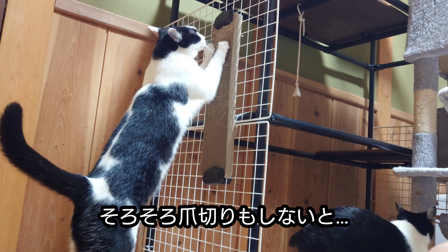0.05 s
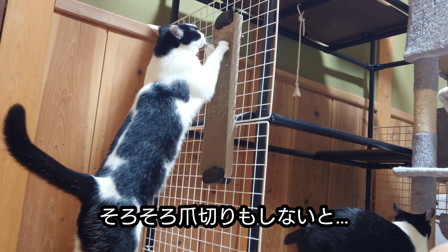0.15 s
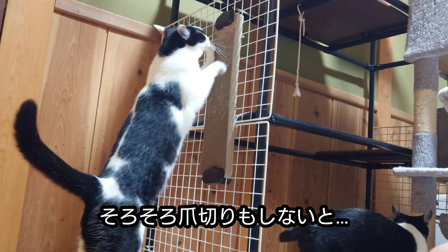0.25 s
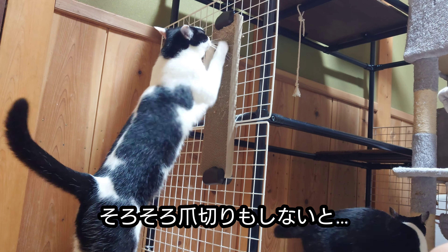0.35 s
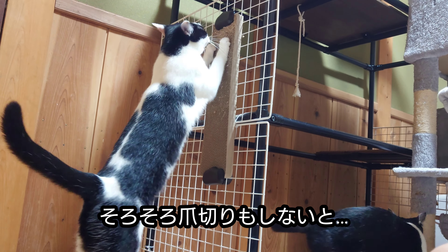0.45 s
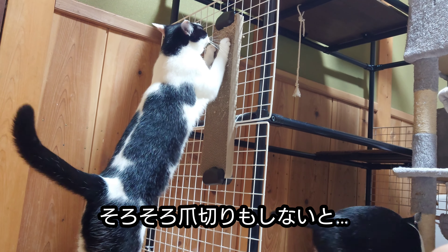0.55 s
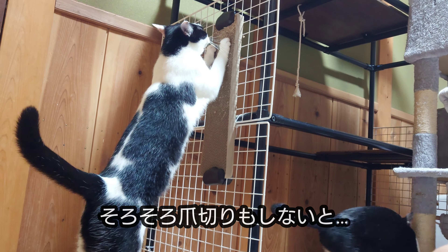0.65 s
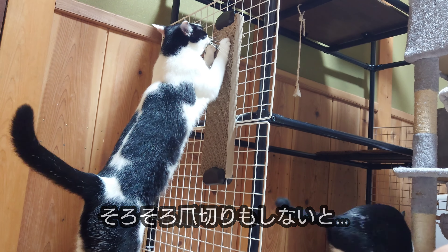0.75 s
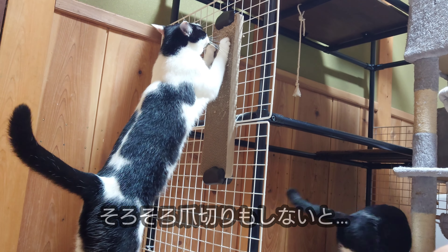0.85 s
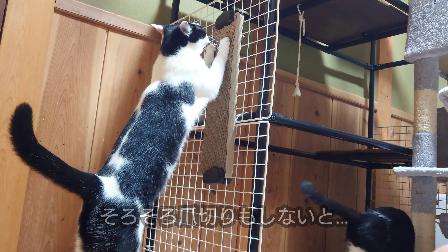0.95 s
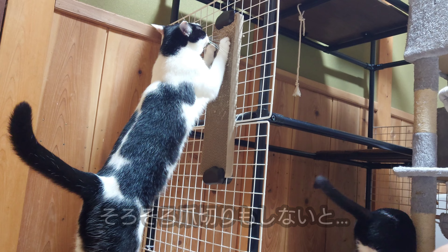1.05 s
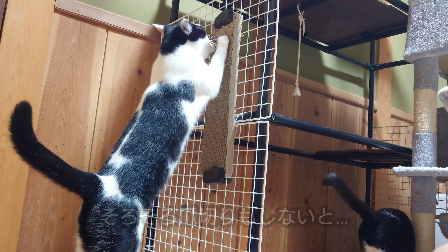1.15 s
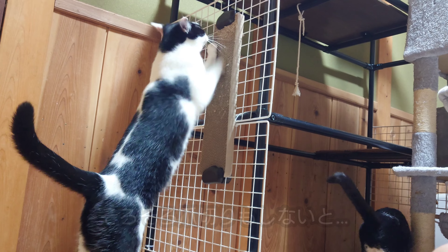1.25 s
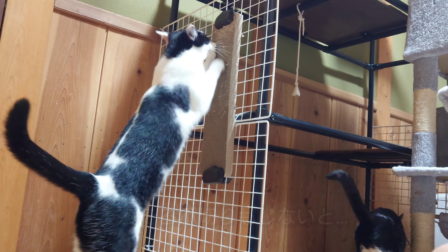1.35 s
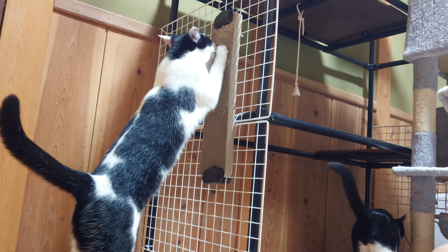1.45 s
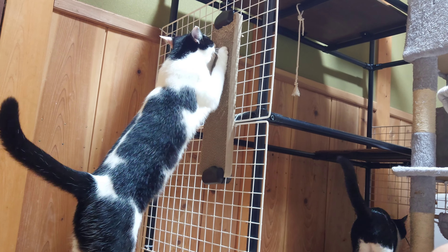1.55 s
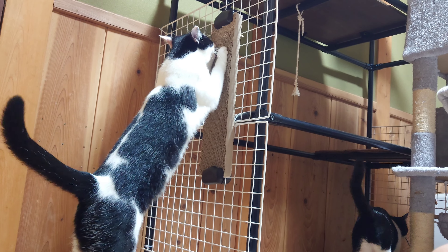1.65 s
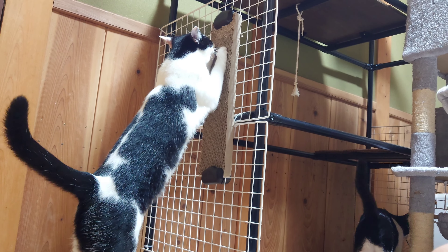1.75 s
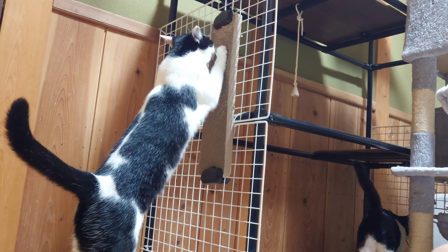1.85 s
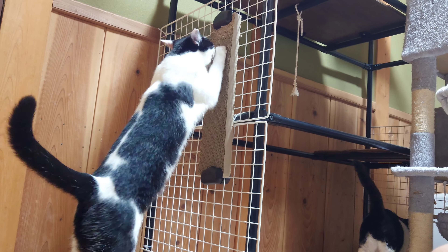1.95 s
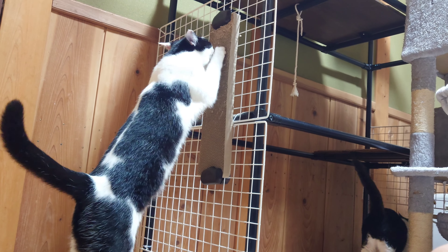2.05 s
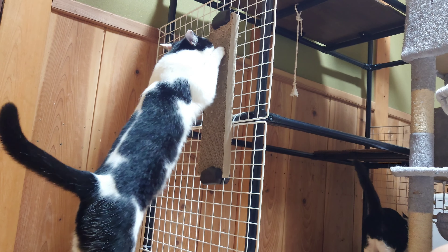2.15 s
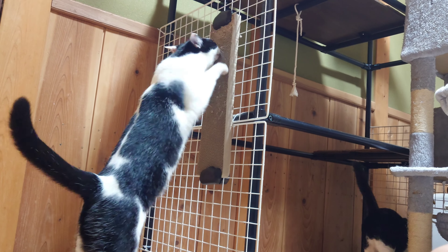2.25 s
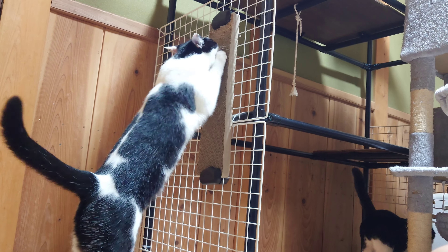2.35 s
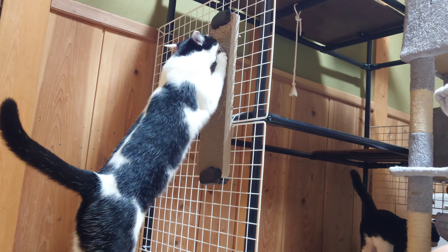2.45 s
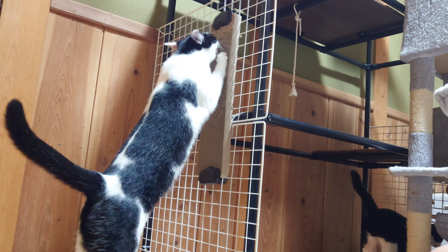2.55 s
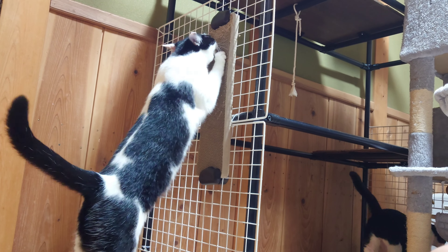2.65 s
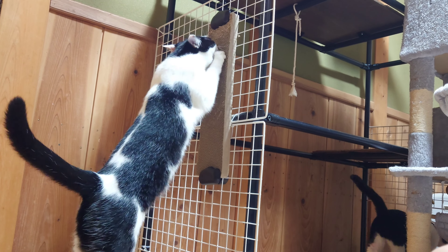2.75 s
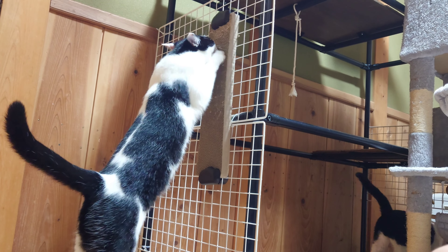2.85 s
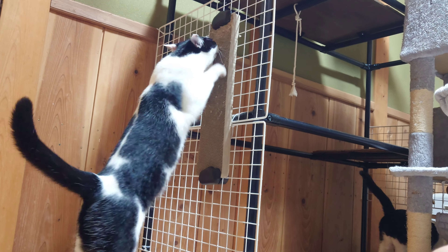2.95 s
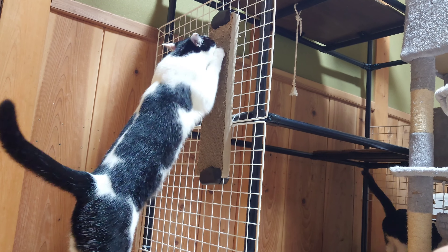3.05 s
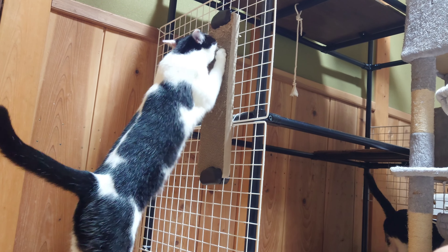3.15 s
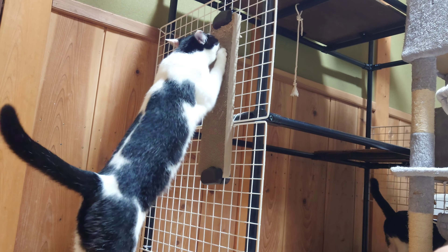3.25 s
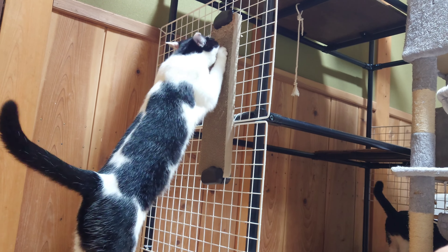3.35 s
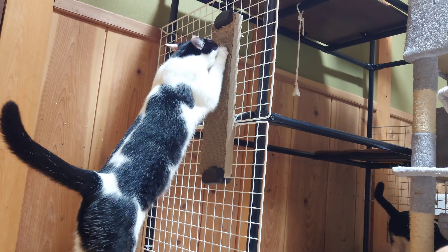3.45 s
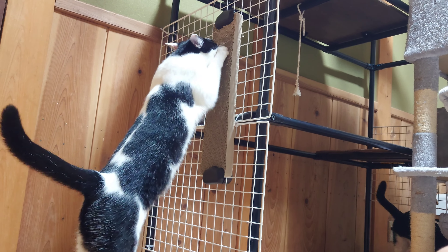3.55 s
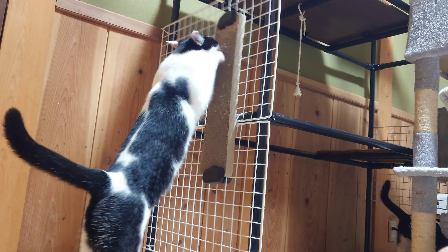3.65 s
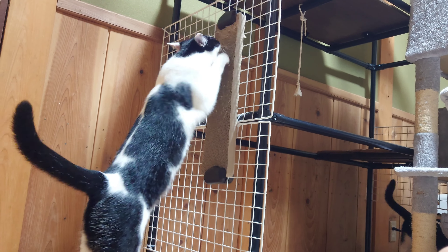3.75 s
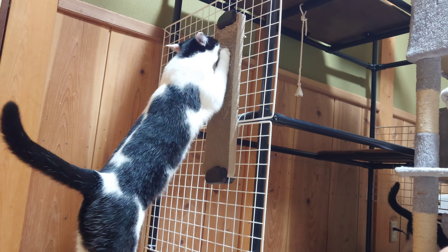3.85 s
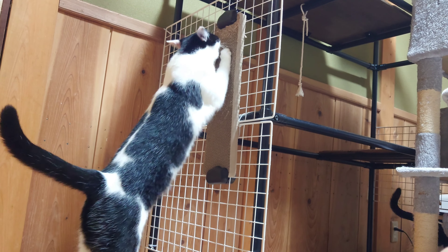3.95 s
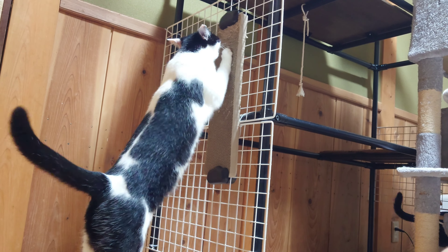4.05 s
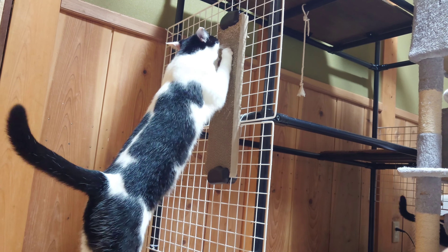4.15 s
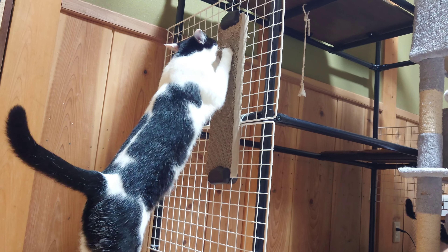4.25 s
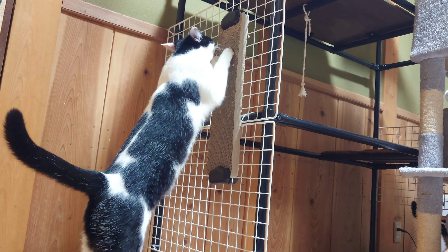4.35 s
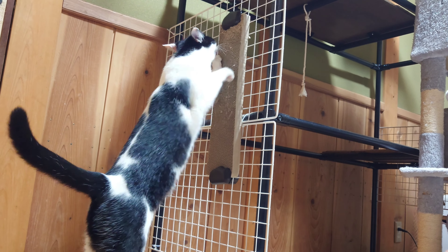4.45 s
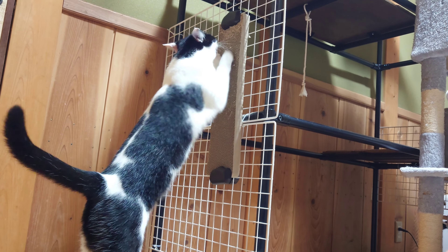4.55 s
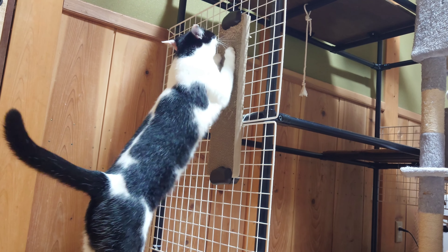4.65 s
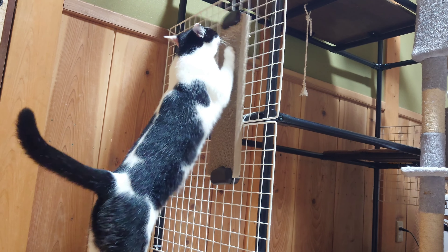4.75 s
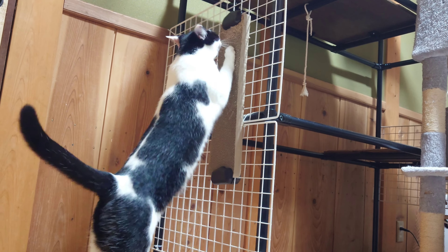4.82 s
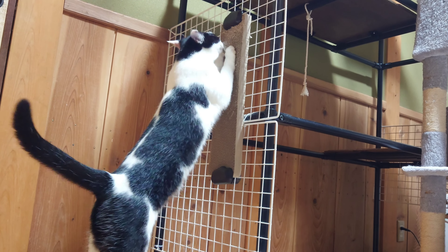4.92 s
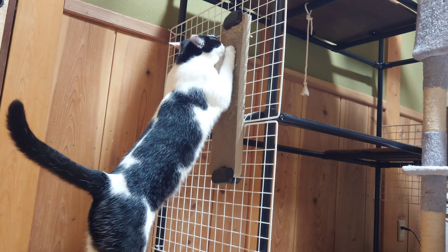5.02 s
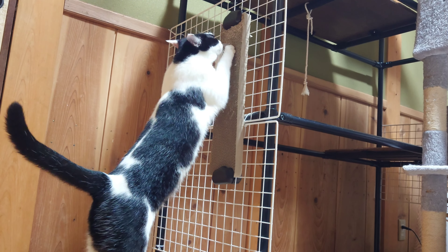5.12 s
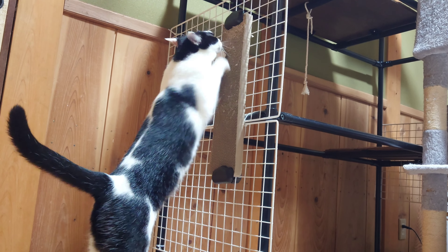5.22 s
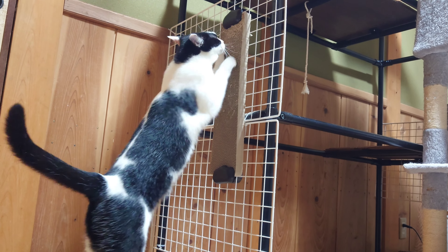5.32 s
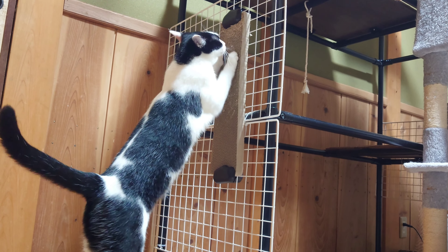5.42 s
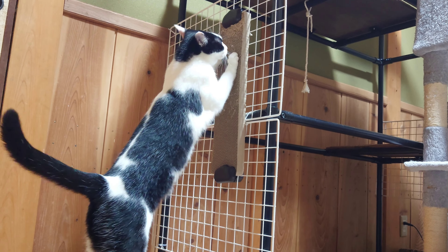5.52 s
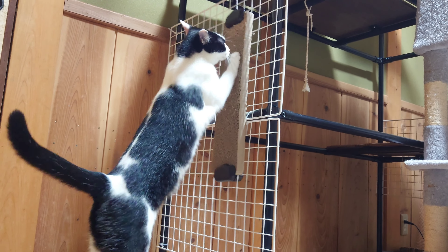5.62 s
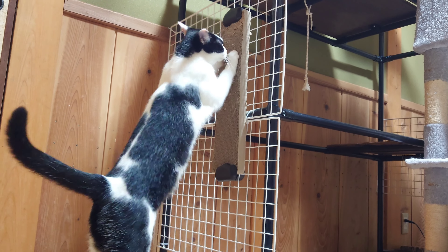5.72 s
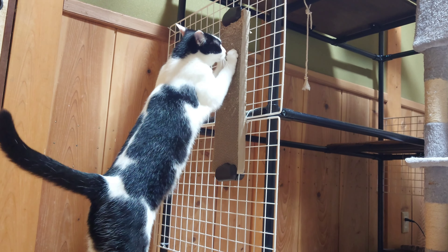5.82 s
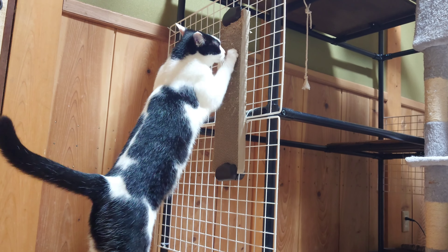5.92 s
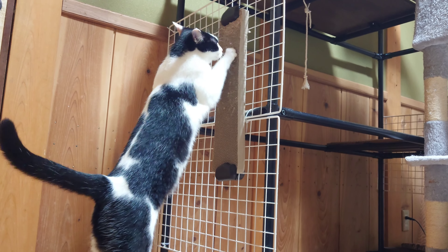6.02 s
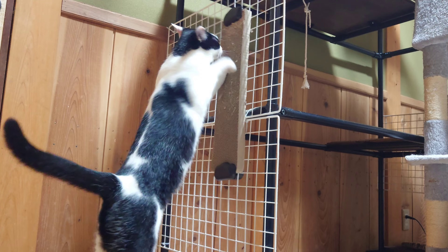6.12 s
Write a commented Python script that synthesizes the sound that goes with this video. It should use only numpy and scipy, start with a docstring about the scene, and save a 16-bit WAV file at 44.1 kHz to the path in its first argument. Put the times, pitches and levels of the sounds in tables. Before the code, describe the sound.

Claws tick onto cardboard, catch, then tear through it in short dry bursts. The wire mesh behind rings briefly and the loose panel thuds and shudders low on its frame. Early strokes are sparse, with two brief breaks; after about two seconds they become regular and stronger, with extra snags and taps between. Near microphone, slightly wide stereo, short small-room reverberation, faint background hiss.

```python
"""Cat on a cardboard scratching board

A cat claws a board tied to a wire mesh panel in a small wood-lined room, heard close by in stereo.
Each paw lands with a tick, then the claws rip through the paper flutes: bursts of random fibre snaps.
The pull of each rip excites the wires, modelled as ringing modes, and the panel rumbles on its frame.
Snags, further taps and bumps join the strokes, over a short reverberation and a faint steady hiss and hum."""
import sys
import numpy as np
from scipy import signal
from scipy.fft import rfft, irfft, next_fast_len
from scipy.io import wavfile
from scipy.ndimage import uniform_filter1d

SR = 44100
rng = np.random.default_rng(int(sys.argv[2]) if len(sys.argv) > 2 else 0)


def materialize(psi):
    """Save the field psi as 16-bit PCM at rate SR to the path in sys.argv[1].

    A 1-D psi becomes a single channel; in a 2-D psi each row is a channel.
    """
    bounded = np.clip(np.atleast_2d(psi).T, -1, 1)
    quanta = np.round(bounded * 32767).astype(np.int16)
    wavfile.write(sys.argv[1], SR, quanta)


N = 272538
TIME = np.arange(N) / SR


def undb(db):
    """Decibels to gain."""
    return 10 ** (np.asarray(db) / 20)


def unit(x):
    """Scale to an energy of one in each channel."""
    return x / np.sqrt(np.sum(x ** 2, axis=-1, keepdims=True) + 1e-18)


def on_log(hz, table, axis=1):
    """Read a column of a table on a log-frequency axis."""
    table = np.array(table)
    return np.interp(np.log(np.maximum(hz, 1)), np.log(table[:, 0]), table[:, axis])


def convolve(x, response):
    """Pass a sound through a mono or stereo response."""
    return signal.fftconvolve(np.atleast_2d(x), np.atleast_2d(response), axes=-1)[:, :N]


def colour(gain_at, size=1024):
    """Causal (minimum-phase) response of unit energy whose relative dB at each frequency is gain_at(Hz)."""
    cepstrum = irfft(np.log(undb(gain_at(np.fft.rfftfreq(size, 1 / SR)))))
    # fold the cepstrum forward so that nothing sounds before its cause
    cepstrum[1:size // 2] *= 2
    cepstrum[size // 2 + 1:] = 0
    return unit(irfft(np.exp(rfft(cepstrum))))


def add(track, s, sound):
    """Mix a sound into a track at time s."""
    start = max(int(s * SR), 0)
    track[..., start:start + sound.shape[-1]] += sound[..., :N - start]


def crackle(size, per_s, scatter_db):
    """Fibres snapping at random moments with uneven strength; rms 1."""
    snaps = rng.random(size) < per_s / SR
    signs = rng.choice([-1, 1], size)
    strength = undb(scatter_db * np.clip(rng.standard_normal(size), -2, 2)) * signs
    return unit(snaps * strength) * np.sqrt(size)


def flutes(size, per_s, depth_db):
    """Gain of a claw that grips and slips unevenly over the ridges of the board."""
    step = int(SR / per_s)
    grip = np.clip(rng.standard_normal(size // step + 2), -1.5, 1.5)
    return undb(depth_db * np.interp(np.arange(size) / step, np.arange(len(grip)), grip))


def nearby(sound, wall_db):
    """A close sound arrives straight, then off the panels around it, in a new pattern for each place."""
    t = TIME[:SR // 28]
    scatter = rng.standard_normal((2, len(t)))
    arrivals = unit(scatter * np.sqrt(t) * np.exp(-t / 0.0047)) * undb(wall_db)
    arrivals[:, 0] += 1  # the straight path
    return convolve(sound, unit(arrivals))


# Torn cardboard up close. Each row: frequency in Hz, relative level in dB.
PAPER_TONE = [(150, -15), (400, -8), (700, -7.5), (950, 0), (1500, 0), (1850, -2.5), (2350, 1), (3100, -3),
              (4200, -4), (4900, -5), (7000, -6), (9500, -16.5), (11000, -11.5), (16000, -18.5)]
# The hard crack of a claw letting go. Each row: frequency in Hz, relative level in dB.
CRACK_TONE = [(300, -22), (1500, -3), (4000, -2), (7000, -4.5), (10000, 3), (16000, -1.5)]


def rip(db, treble_db, tear_s, drag_db):
    """A rip is a crack, a tear and a weaker drag; returns its sound and the force on the board."""
    t = TIME[:SR // 2]
    # the tear swells in within a millisecond, then fades away at once
    tear = crackle(len(t), per_s=3200, scatter_db=4.5) * flutes(len(t), per_s=300, depth_db=2.0)
    tear_shape = np.exp(-(t / tear_s) ** 0.97) * (1 - np.exp(-t / 0.0008))
    tear = unit(tear * tear_shape) * np.sqrt(tear_s * SR / 2)
    drag = crackle(len(t), per_s=260, scatter_db=3.5) * flutes(len(t), per_s=70, depth_db=2.5)
    force = tear + drag * undb(drag_db) * np.exp(-(t / 0.14) ** 2)
    paper = colour(lambda hz: on_log(hz, PAPER_TONE) + treble_db * hz ** 2 / (hz ** 2 + 3500 ** 2))
    # the harder the pull, the more of it goes into the first bright crack
    crack = crackle(len(t), per_s=6300, scatter_db=8.5) * np.exp(-t / 0.0015) * undb(0.4 * db + 11)
    hard = colour(lambda hz: on_log(hz, CRACK_TONE))
    return undb(db + treble_db / 2) * (convolve(force, paper) + convolve(crack, hard)), force


# Full strokes of a paw, levels relative within each part. Each row: start of the rip in seconds,
# rip level in dB, treble tilt in dB, tear decay in seconds, drag after it in dB, first touch in dB,
# catch in dB, pitch of the catch in Hz, shake of the panel in dB.
PAW_STROKES = [(0.396, -35.5, -4.5, 0.015, -19.5, -52.5, -28, 2500, -46),
               (1.447, -47, 7.5, 0.038, -21.5, -37, -30, 4000, -41.5),
               (2.390, -36, 2.5, 0.018, -18.5, -48, -24, 2380, -41),
               (2.731, -32.5, 1.5, 0.018, -19.5, -29, -24, 4200, -42.5),
               (3.079, -31, -5, 0.017, -24.5, -37, -25.5, 5900, -41),
               (3.411, -31.5, 4, 0.016, -16.5, -35.5, -25, 4430, -39.5),
               (3.858, -31, 1.5, 0.016, -17, -27, -23.5, 5100, -39),
               (4.201, -32, 3, 0.018, -15.5, -44, -25, 3550, -38),
               (4.612, -43.5, 6, 0.014, -15, -67, -29.5, 4500, -47),
               (4.971, -28, 3, 0.018, -13.5, -37, -23, 4130, -37.5),
               (5.408, -38.5, 1, 0.03, -24, -54, -30, 4370, -46.5),
               (5.808, -31.5, 0, 0.019, -17, -54, -30.5, 2310, -40)]
# A single claw snagging on loose paper. Each row: start in seconds, relative level in dB,
# treble tilt in dB, tear decay in seconds, pull on the wires in dB relative to the snag level.
PAPER_SNAGS = [(0.001, -48, 4.5, 0.0034, 5.5), (0.586, -59, 6, 0.021, -3), (0.715, -56.5, -18, 0.029, -9),
               (1.690, -57.5, -24, 0.027, -6), (2.012, -45.5, -9, 0.043, -13), (2.035, -47, 8, 0.012, -6),
               (2.080, -53.5, 10.5, 0.021, 4.5), (2.156, -48.5, 2.5, 0.011, -6),
               (3.163, -46.5, 8.5, 0.011, -20), (4.843, -53.5, 1.5, 0.019, 8.5),
               (5.052, -32.5, 0.5, 0.016, -5), (5.535, -56, 3.5, 0.019, -8), (5.965, -54, 0, 0.029, 9.5),
               (6.119, -52, 5, 0.015, 4.5)]
FIRM_DB = -32  # table level of a firm stroke
CATCH_LEAD_S, TOUCH_LEAD_S = 0.0292, 0.011  # catch before a firm rip, first touch before the catch


def tearing():
    """Strokes and snags tear the paper; returns the near sound, the room's share and the pull on the wires."""
    snag_drag_db = -26
    firm_pull_db, pull_follows = -34.5, 0.49  # pull in a firm stroke, and its dB per dB of the stroke
    near, far, pull = np.zeros((2, N)), np.zeros((1, N)), np.zeros(N)
    rips = []
    for s, db, treble_db, tear_s, drag_db, *_ in PAW_STROKES:
        pull_db = firm_pull_db + pull_follows * (db - FIRM_DB)
        rips.append((s, db, treble_db, tear_s, drag_db, pull_db))
    for s, db, treble_db, tear_s, ring_db in PAPER_SNAGS:
        rips.append((s, db, treble_db, tear_s, snag_drag_db, db + ring_db))
    for s, db, treble_db, tear_s, drag_db, pull_db in rips:
        sound, force = rip(db, treble_db, tear_s, drag_db)
        add(near, s, nearby(sound, wall_db=1.5))
        add(far, s, sound)
        add(pull, s, undb(pull_db) * force)
    return near, far, pull


# Further claw taps, between and within the strokes. Each row: start in seconds, relative level in dB,
# pitch of the snap in Hz.
CLAW_TAPS = [(0.025, -40, 2000), (0.093, -41.5, 4500), (0.281, -41.5, 2300), (0.330, -43, 2170),
             (1.255, -54.5, 3950), (1.288, -50.5, 3550), (1.314, -48.5, 4300), (1.355, -48.5, 3770),
             (1.592, -35.5, 5900), (2.258, -39.5, 4420), (2.561, -38.5, 2060), (2.614, -36.5, 2160),
             (2.891, -44, 2330), (3.209, -34.5, 4190), (3.33, -48.5, 2220), (3.551, -32.5, 4030),
             (3.713, -45, 2100), (4.142, -46, 2060), (4.362, -35, 2140), (4.507, -33, 3650),
             (4.812, -33, 2300), (4.845, -31.5, 3700), (4.956, -30, 2300), (5.273, -38.5, 3960),
             (5.356, -34.5, 3680), (6.092, -36.5, 2390)]


def contacts():
    """Every stroke opens with a touch and a catch, and further taps are added. Rows of (s, dB, Hz)."""
    touch_hz = 2400
    hold_s_per_db = 0.00052  # a claw holds longer for each dB that the pull is weaker than a firm one
    rows = []
    for s, db, _, _, _, touch_db, catch_db, catch_hz, _ in PAW_STROKES:
        catch_s = s - CATCH_LEAD_S - hold_s_per_db * (FIRM_DB - db)
        rows += [(catch_s - TOUCH_LEAD_S, touch_db, touch_hz), (catch_s, catch_db, catch_hz)]
    return rows + CLAW_TAPS


# A claw tip on the board up close. Each row: frequency in Hz, relative level in dB.
CLAW_TONE = [(200, -11.5), (800, -1.5), (1600, -1), (2300, -4), (3000, -3), (4000, -2.5), (5000, -1),
             (7000, -6), (9500, -15.5), (16000, -10)]


def claw_ticks():
    """The pad brushes the board, then a claw snaps on a ridge and skids; returns near sound and room share."""
    skid_s, pitch_lift_db, room_share_db = 0.0029, 7.5, 2.5
    near, far = np.zeros((2, N)), np.zeros((1, N))
    lead = SR // 100  # samples of brushing before the snap
    t = (np.arange(SR // 8) - lead) / SR
    brush = undb(-12) * np.exp(-np.abs(t) / 0.0052)
    snap = undb(8) * np.exp(-np.abs(t) / 0.00038)
    skid = (t >= 0) * (np.exp(-np.abs(t) / skid_s) + snap)
    rasp = colour(lambda hz: on_log(hz, CLAW_TONE))
    for s, db, snap_hz in contacts():
        force = unit(crackle(len(t), per_s=7000, scatter_db=2.5) * (brush + skid))
        force = force * np.sqrt(skid_s * SR / 2) * undb(db - 8.0)

        def pitched(hz):
            octaves = np.log2((hz + 1) / snap_hz)
            return on_log(hz, CLAW_TONE) + pitch_lift_db * np.exp(-(octaves / 0.43) ** 2)

        # the near sound has the pitch of the snap; the room gets only the broad rasp
        add(near, s - lead / SR, nearby(convolve(force, colour(pitched)), wall_db=0.0))
        add(far, s - lead / SR, undb(room_share_db) * convolve(force, rasp))
    return near, far


# Damped resonances of the board on its mesh. Each row: frequency in Hz, width in Hz, lift in dB.
BOARD_RESONANCES = [(394, 29, 11.5), (883, 68, 6.5), (1416, 55, 5), (1535, 93, 5.5), (2265, 197, 5),
                    (2660, 70, 2.5), (3476, 46, 6), (3930, 200, 6.5), (4375, 95, 6), (6160, 100, 4.5),
                    (6877, 255, 9), (13400, 570, 3)]


def board(sound):
    """The board and the wires behind it give every scrape the same hollow ring."""
    def lift_db(hz):
        return sum(db / (1 + (2 * (hz - f) / width) ** 2) for f, width, db in BOARD_RESONANCES)

    return convolve(sound, colour(lift_db, size=4096))


def diffuse(size, alike_hz):
    """Spectra of stereo noise: alike in the bass, increasingly unrelated above alike_hz."""
    hz = np.fft.rfftfreq(size, 1 / SR)
    alike = 1 / (1 + (hz / alike_hz) ** 2)
    mid, side = rfft(rng.standard_normal((2, size)))
    return hz, np.sqrt(1 + alike) * mid + np.sqrt(1 - alike) * np.outer([1, -1], side)


def dense_ring(x, table, build_s, alike_hz, count=22):
    """Countless modes store the energy of each band: it builds up, then dies at the band's own rate."""
    hz, spectra = diffuse(2 * next_fast_len(N // 2 + 1, True), alike_hz)
    x = x + 1e-12 * rng.standard_normal(N)  # keeps silent stretches off exact zero
    edges = np.geomspace(110, 17000, count)
    build = np.exp(-1 / (build_s * SR))
    out = 0
    for lo, hi in zip(edges, edges[1:]):
        band = signal.butter(3, [lo, hi], "bandpass", fs=SR, output="sos")
        centre = np.sqrt(lo * hi)
        keep = np.exp(-2 * np.log(1000) / (on_log(centre, table, axis=2) * SR))
        energy = signal.lfilter([1 - keep], [1, -keep], signal.sosfilt(band, x) ** 2)
        energy = signal.lfilter([1 - build], [1, -build], energy)
        carrier = irfft(spectra * ((hz >= lo) & (hz < hi)))[:, :N]
        out = out + undb(on_log(centre, table)) * np.sqrt(energy * N) * unit(carrier)
    return out


def modes(table, spread):
    """Stereo ring of a few modes; each reaches the two sides with its own phase."""
    t = TIME[:SR]
    out = 0
    for hz, db, t60 in table:
        phase = spread * rng.standard_normal((2, 1))
        decay = np.exp(-np.log(1000) * t / t60)
        out = out + undb(db) * np.sin(2 * np.pi * hz * t + phase) * decay
    return unit(out)


# The many weak modes of the mesh. Each row: frequency in Hz, relative level in dB, 60 dB decay in seconds.
MESH_MODES = [(120, 3, 0.93), (178, -0.5, 0.68), (269, -0.5, 0.64), (454, 6, 0.54), (586, -4.5, 0.47),
              (860, -0.5, 0.58), (1440, -7.5, 0.58), (2390, -16.5, 0.72), (4000, -28.5, 0.34),
              (8000, -55.5, 0.34)]
# The wires that stand out. Each row: frequency in Hz, relative level in dB, 60 dB decay in seconds.
WIRE_MODES = [(144, 0.5, 0.94), (263.7, -2.5, 0.95), (352.6, -2, .65), (384.4, -2.5, 0.9), (394, 0.5, 0.93),
              (527, 2.5, 0.69), (663, -6, 1), (935, -8.5, 0.69), (960, -5.5, 0.32), (1137, -13.5, 0.26),
              (1267, -0.5, 0.61), (1425, -5.5, .5), (1500, -7, 0.28), (2130, -10.5, 0.49),
              (2320, -3.5, 0.31), (2980, -19, 0.21), (3830, -3, .25)]


def wires(pull):
    """The jolt spreads through the welded mesh, which rings on after the paper is quiet."""
    mesh = dense_ring(pull, MESH_MODES, build_s=0.039, alike_hz=550)
    singing = convolve(pull, modes(WIRE_MODES, spread=0.79))
    return undb(13.5) * mesh + undb(-1.0) * singing


def shake(s, db, hold_s):
    """Size of the panel's swing after one push: it rises, holds, settles quickly and sways on."""
    rise = np.clip((TIME - s) / (0.35 * hold_s), 0, 1)  # part of the hold is spent swinging up
    free_s = np.maximum(TIME - s - hold_s, 0)
    settle = undb(-95 * free_s)  # dB per second
    sway = undb(-12 - 43.5 * free_s)  # weaker, but outlasts the shake
    return undb(db) * rise * np.maximum(settle, sway)


# Bending modes of the whole panel. Each row: frequency in Hz, relative level in dB, 60 dB decay in seconds.
PANEL_MODES = [(57.7, -18, 0.035), (69.55, -2, 0.55), (88.06, 6, 0.42), (114.3, -10, 0.46)]
# The cat shifts its weight and the panel bumps its frame. Each row: start in seconds, relative level in dB.
FRAME_BUMPS = [(-0.02, -40.5), (0.14, -51), (0.27, -52), (0.62, -43.5), (1.27, -56.5), (1.35, -54.5),
               (1.67, -49.5), (2.05, -39), (2.13, -38), (2.65, -39), (3.60, -46), (4.10, -41), (4.36, -44),
               (4.52, -46.5), (4.72, -48.5), (4.87, -42), (5.69, -50), (6.05, -49)]


def shudder():
    """The loose panel knocks on its frame, and its bending modes rumble as hard as the cat shakes it."""
    knocks_per_s, smooth_s = 90, 0.045  # the rumble's level is evened out over smooth_s seconds
    stroke_hold_s, bump_hold_s = 0.17, 0.04
    knocks = crackle(N, per_s=knocks_per_s, scatter_db=3.5)
    knocks[0] = np.sqrt(SR / knocks_per_s)  # the panel is in motion from the start
    rumble = convolve(knocks, modes(PANEL_MODES, spread=0.17))
    level = uniform_filter1d(np.abs(signal.hilbert(rumble[0])), int(smooth_s * SR))
    # a stroke pulls on the panel from about its first touch
    pushes = [(s - CATCH_LEAD_S - TOUCH_LEAD_S, shake_db, stroke_hold_s) for s, *_, shake_db in PAW_STROKES]
    pushes += [(s, db, bump_hold_s) for s, db in FRAME_BUMPS]
    size = np.sqrt(sum(shake(*push) ** 2 for push in pushes))
    side_gain = undb(np.array([[4.2], [.9]]))  # left, right
    rumble = rumble / (level + 1e-6) * size * side_gain
    # low cut: the rumble fades out below about 46 Hz
    return signal.sosfilt(signal.butter(5, 46, "highpass", fs=SR, output="sos"), rumble)


# Reverberation of the small room. Each row: frequency in Hz, relative level in dB, 60 dB decay in seconds.
ROOM_DECAY = [(100, 11, 0.15), (960, 4, 0.23), (4230, -0.5, 0.27), (8000, 0, 0.18), (16000, 0, 0.24)]


def reverberation(far):
    """The room stores the energy of each band and gives it back as a short diffuse tail."""
    return dense_ring(far[0], ROOM_DECAY, build_s=0.0045, alike_hz=582)


# Faint steady background hiss with a low hum of noise. Each row: frequency in Hz, relative level in dB.
HISS_TONE = [(15, -56.5), (25, -11), (82, -4.5), (217, -29), (317, -18), (476, -20), (818, -26),
             (1610, -27.5), (1740, -35), (16000, -36)]


def background_hiss():
    """Faint steady hiss with a low hum of noise: shaped stereo noise, alike on both sides in the bass."""
    hz, noise = diffuse(N, alike_hz=400)
    return unit(irfft(noise * undb(on_log(hz, HISS_TONE)), N)) * np.sqrt(N) * undb(-83)


def scene():
    """Paper and claws close by, their reverberation, the ringing and shaking panel, the background hiss."""
    paper, paper_far, pull = tearing()
    claws, claws_far = claw_ticks()
    tail = reverberation(undb(1.0) * paper_far + claws_far)
    scrapes = board(undb(2.5) * paper + claws + tail)
    return scrapes + wires(pull) + shudder() + background_hiss()


def record(dry):
    """The sound has a dip in the treble near 8.4 kHz, the left is brighter, and the very top is cut."""
    top_hz = 15800
    hz = np.fft.rfftfreq(N, 1 / SR)
    dip_db = -19 * np.exp(-((hz - 8400) / 560) ** 2)
    lean_db = np.outer([1, -1], np.interp(hz, [5500, 12000], [0, 2.2]))
    heard = irfft(rfft(dry) * undb(dip_db + lean_db), N)
    return signal.sosfilt(signal.ellip(8, .2, 70, top_hz, fs=SR, output="sos"), heard)


dry = scene()
out = record(dry)
materialize(out)
```